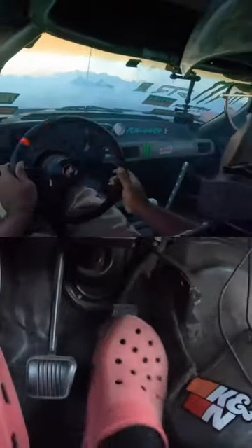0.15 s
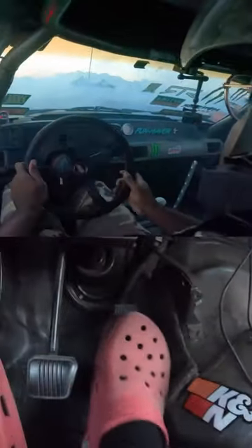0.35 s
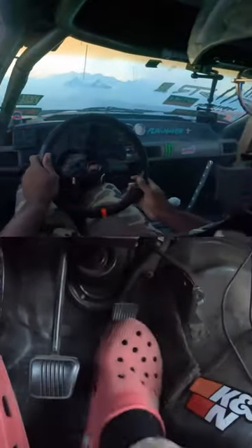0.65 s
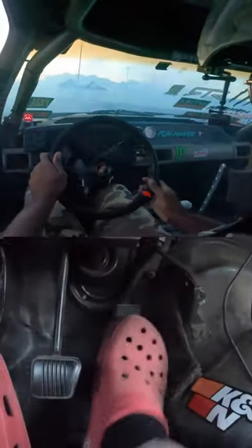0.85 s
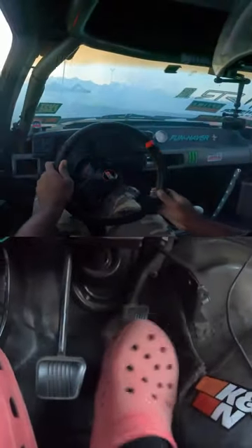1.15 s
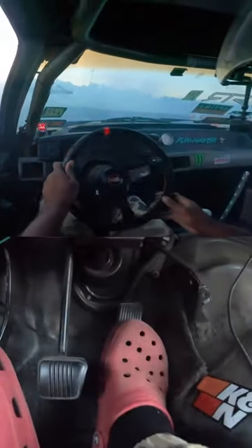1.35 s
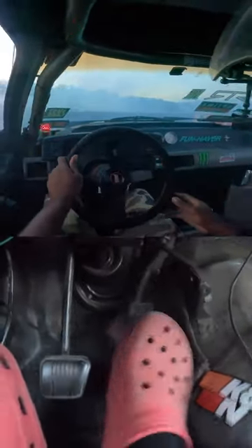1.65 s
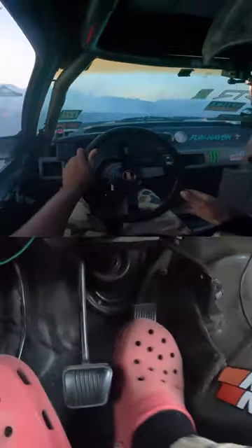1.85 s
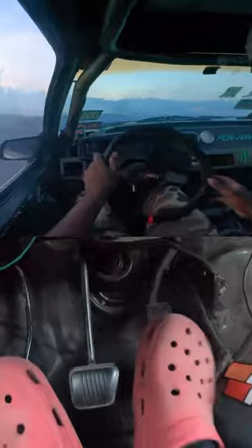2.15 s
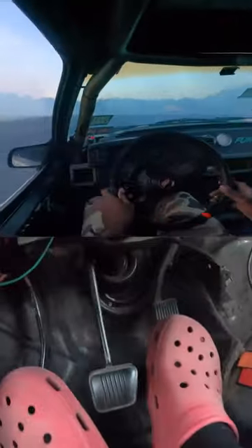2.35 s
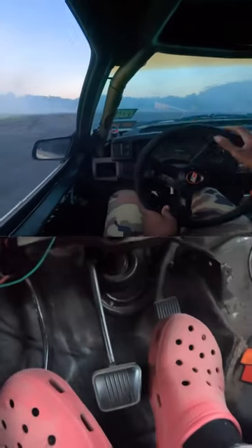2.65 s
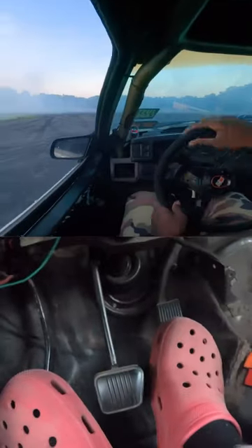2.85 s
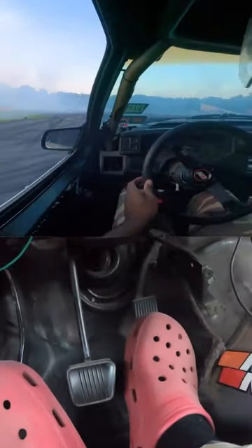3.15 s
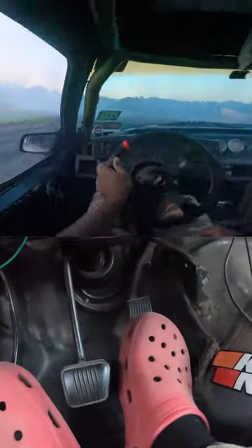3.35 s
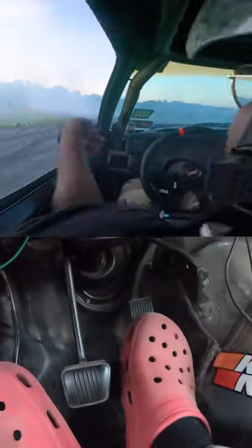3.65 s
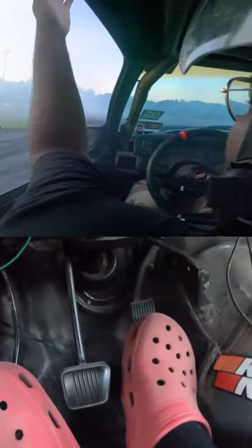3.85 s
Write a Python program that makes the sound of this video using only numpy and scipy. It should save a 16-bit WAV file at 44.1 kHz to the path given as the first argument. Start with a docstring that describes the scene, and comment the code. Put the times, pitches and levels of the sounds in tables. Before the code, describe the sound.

Inside a stripped car, from the driver's seat: a loud raspy eight-cylinder engine lifts and surges, revs fall under wavering tyre squeal, a gritty scuff follows, then a low uneven drone with slight rattles and wind.

```python
"""Inside a drifting car: an eight-cylinder engine roars at high revs, built from harmonics, pulses and noise.
The throttle is lifted and stabbed, with burble and ragged pops, while shaped noise makes wind and road.
Then the revs sink and the tyres howl through a slide: two unsteady tones that end in a gritty scuff.
The engine picks up again in a low drone, late on with a limping beat and bark as one cylinder misses.
Loose parts clatter in the bare cabin from the end of the slide on, as short bursts of grainy noise."""
import sys
import numpy as np
from scipy import signal
from scipy.fft import rfft, irfft, next_fast_len
from scipy.io import wavfile
from scipy.ndimage import uniform_filter1d, minimum_filter1d, map_coordinates

SR = 44100
rng = np.random.default_rng(int(sys.argv[2]) if len(sys.argv) > 2 else 0)


def store_wav(level_fs):
    """Save 16-bit WAV to argv[1]."""
    pcm = np.round(np.clip(np.atleast_2d(level_fs), -1, 1) * 32767)
    wavfile.write(sys.argv[1], SR, pcm.T.astype(np.int16))


N = 175959  # length in samples
CYLINDERS = 8


def amp(db):
    """Turn decibels into a plain multiplier."""
    return 10 ** (np.asarray(db) / 20)


def unit(x):
    """Bring a sound to an average (rms) level of 1."""
    return x / np.sqrt(np.mean(x ** 2) + 1e-20)


def curves(rows):
    """Join a table's points with straight lines: one value per sample for each column after the time."""
    times_s, *columns = np.transpose(rows)
    return [np.interp(np.arange(N) / SR, times_s, column) for column in columns]


def wobble(rate):
    """A random curve around 0, drawn through `rate` random points a second."""
    coarse = np.arange(0, N + 32, 32)  # worked out every 32 samples, then joined up
    knots = rng.standard_normal(4096)
    coarse_curve = map_coordinates(knots, [coarse * rate / SR], mode="wrap")
    return np.interp(np.arange(N), coarse, coarse_curve)


def filtered(x, response):
    """Multiply each frequency of x by response(frequency in Hz)."""
    size = next_fast_len(N + SR // 2)  # spare room so that the end does not wrap onto the start
    spectrum = rfft(x, size) * response(np.fft.rfftfreq(size, 1 / SR))
    return irfft(spectrum, size)[:N]


def shaped(x, points):
    """Raise or lower the frequencies of x along a curve of (frequency_hz, level_db) points."""
    point_hz, point_db = np.transpose(points)
    return filtered(x, lambda hz: amp(np.interp(np.log(hz + 1), np.log(point_hz), point_db)))


def coloured(x, points):
    """Shape x in the same way, then bring it to rms 1."""
    return unit(shaped(x, points))


def noise(points):
    """Random noise of a given colour, at rms 1."""
    return coloured(rng.standard_normal(N), points)


def engine():
    """One crankshaft drives every engine sound, so they all speed up and slow down together."""
    # exhaust note on open throttle: time_s, level_db (before the cabin)
    roar_level = [(0, -10.5), (0.168, -9), (0.269, -13), (.45, -11.5), (.6, -9.5), (0.921, -9.5),
                  (1.06, -12.5), (1.129, -15.5), (1.23, -15), (1.33, -7), (1.6, -10.5), (1.68, -17.5),
                  (1.8, -14.5), (1.859, -10.5), (1.951, -8), (2.1, -24), (2.3, -55)]
    # exhaust burble on closed throttle: time_s, level_db (before the cabin)
    burble_level = [(0.981, -33.5), (1.119, -13.5), (1.55, -40), (1.669, -12.5), (1.87, -23), (2.88, -16),
                    (3.02, -41)]
    # exhaust drone pulling from low revs: time_s, level_db (before the cabin)
    drone_level = [(2.749, -51.5), (2.9, -15), (2.98, -10.5), (3.25, -11), (3.401, -14), (3.7, -8.5),
                   (3.99, -9.5)]
    # harmonics of each exhaust sound: multiple of the engine cycle, relative level_db
    roar_orders = [(1, -14), (2, 2), (3, -17), (4, -1.5), (5, -8), (6, -13), (7, -14), (8, 0), (9, -13),
                   (11, -17), (12, -13), (16, -16), (17, -13), (20, -17)]
    burble_orders = [(1, -11), (3, 7.5), (4, -7), (5, -2), (6, -4), (7, -1.5), (8, -3.5)]
    drone_orders = [(4, -21.5), (5, -18), (6, -20.5), (8, 1.5), (9, -17), (10, -16.5), (11, -17),
                    (14, -16.5), (16, -10), (17, -20), (19, -18.5), (20, -21), (24, -16.5), (40, -24)]
    # unevenness of burning at high revs: time_s, roughness (0-1)
    misfire = [(.15, 0.2), (.26, 0.66), (.55, .08), (.95, .08), (1.2, 0.8), (1.42, 0.1), (1.6, 0.3),
               (1.72, 0.6), (2.1, 0.82)]
    # how the bare cabin favours or swallows the exhaust harmonics: frequency_hz, level_db
    cabin = [(55, -2.5), (84, -3), (104, -11), (125, -3), (147, 3), (172, -7), (205, 5), (232, 2.5),
             (266, 6), (300, -1), (328, -2), (350, 1), (410, 3.5), (485, -4), (530, -2.5), (800, -8),
             (900, -0.5), (970, -4)]
    # a hoarse resonance of the exhaust under load: time_s, level_db
    hoarse_level = [(3.1, -49.5), (3.45, -33.5), (3.8, -32), (3.99, -32)]
    # shape of that resonance: frequency_hz, relative level_db
    hoarse_colour = [(600, -37), (790, -1), (845, 4.5), (910, -17), (1500, -69)]

    cycles = crank(flutter=.002)
    misfire_rough, = curves(misfire)
    roar = exhaust(cycles, roar_level, roar_orders, rough=misfire_rough, steadiness=2.1, rough_rate=45)
    burble = exhaust(cycles, burble_level, burble_orders, rough=0.76, steadiness=0.99, rough_rate=55)
    drone = exhaust(cycles, drone_level, drone_orders, rough=0.48, steadiness=7, rough_rate=28)
    grit = rasp(cycles, pulse_db=6, gas_db=0.5, gating=0.38, drift_rate=7, count=14)
    hoarse_pulses = firings(cycles, stagger=.1, jitter=0.037, cylinder_db=4.5, scatter_db=-0.5)
    hoarse = amp(curves(hoarse_level)[0]) * coloured(hoarse_pulses, hoarse_colour)
    high_revs = shaped(roar + burble, cabin)
    low_revs = loping(shaped(drone, cabin), cycles, rough=0.56)
    return high_revs + low_revs + pops(cycles) + grit + hoarse


def crank(flutter):
    """Count engine cycles by adding up the speed; eight firings make one cycle, and the speed is a bit uneven."""
    # engine speed before the flutter: time_s, firing_hz (firings per second)
    speed = [(0, 398.4), (.08, 411.2), (.18, 401.4), (.22, 379.1), (.5, 402.1), (.63, 405.3), (.74, 424),
             (.83, 413.3), (.9, 413.2), (1.02, 435.7), (1.09, 419.1), (1.2, 359.6), (1.27, 347.5),
             (1.36, 349.8), (1.47, 388.3), (1.56, 403.2), (1.63, 403.8), (1.69, 368.4), (1.78, 341),
             (1.84, 307.3), (1.96, 310.8), (2.1, 255), (2.33, 155.9), (2.8, 98.24), (2.94, 127.2),
             (3.02, 133.9), (3.22, 133.9), (3.3, 144.8), (3.5, 147.5), (3.76, 162.4), (3.9, 163),
             (3.99, 169.3)]
    firing_hz, = curves(speed)
    unsteady_hz = firing_hz * (1 + flutter * wobble(35))
    return np.cumsum(unsteady_hz) / SR / CYLINDERS


def exhaust(cycles, level, orders, rough, steadiness, rough_rate):
    """Add harmonics of the engine cycle, each shaken at random by uneven burning."""
    out = np.zeros(N)
    for order, db in orders:
        order = round(order)
        firing = order in (CYLINDERS // 2, CYLINDERS, 2 * CYLINDERS)
        # with steadiness well above 1, firing harmonics shake only when the burning is very uneven
        shake = np.clip(rough, 0, 1) ** (steadiness if firing else 1)
        start = 0 if firing else rng.random()
        phase = 2 * np.pi * (order * cycles + start)
        in_step = (1 + shake * wobble(rough_rate)) * np.cos(phase)
        out_of_step = shake * wobble(rough_rate) * np.sin(phase)
        out += amp(db) * (in_step + out_of_step)
    return unit(out) * amp(curves(level)[0])


def firings(cycles, stagger, jitter, cylinder_db, scatter_db):
    """One pulse per firing; its time (in firing gaps) and size vary by cylinder and by chance."""
    count = np.arange(2048)
    own = rng.standard_normal((2, CYLINDERS))[:, count % CYLINDERS]  # each cylinder's own timing and size
    moment = count + stagger * own[0] + jitter * rng.standard_normal(len(count))
    at = np.interp(moment, cycles * CYLINDERS, np.arange(N))
    sizes = amp(cylinder_db * own[1] + scatter_db * rng.standard_normal(len(count)))
    sizes = sizes * (at > 0) * (at < N - 1)  # drop firings outside the scene
    # make crowded pulses smaller, so that fast running is not louder
    return np.bincount(at.astype(int), sizes, N) / np.sqrt(np.gradient(cycles))


def rasp(cycles, pulse_db, gas_db, gating, drift_rate, count):
    """Each firing sends a sharp pulse and gas noise pulses along; the pulse's brief cabin ring keeps shifting."""
    # exhaust rasp, before the pulse and gas levels: time_s, level_db
    rasp_level = [(0.0, -34), (0.07, -28.5), (0.2, -37.5), (0.21, -28), (0.38, -30.5), (0.47, -26.5),
                  (0.59, -34.5), (0.69, -26.5), (0.79, -35), (0.95, -30.5), (1.04, -26), (1.09, -31),
                  (1.22, -34), (1.24, -25.5), (1.32, -29.5), (1.58, -29.5), (1.81, -41), (1.83, -29),
                  (1.91, -30), (1.98, -35.5), (2.4, -50.5), (2.92, -46.5), (2.97, -45.5), (3.36, -40.5),
                  (3.99, -49)]
    # its colour: frequency_hz, relative level_db
    rasp_colour = [(250, -30.5), (450, 11.5), (620, 7), (740, 2), (900, 4), (1300, -0.5), (1800, -2.5),
                   (2520, -7.5), (2900, -15), (3800, -17.5), (5000, -28.5), (8000, -40.5), (12500, -54.5)]
    cabin_t60_s = .035  # time for the ring to fall by 60 dB

    pulses = firings(cycles, stagger=.3, jitter=.028, cylinder_db=1.5, scatter_db=1.5)
    t = np.arange(SR // 8) / SR
    tails = rng.standard_normal((count, len(t))) * amp(-60 * t / cabin_t60_s)
    # blend several rings, with the shares drifting while their summed power stays even
    shares = np.array([wobble(drift_rate) for _ in tails])
    shares = shares / np.linalg.norm(shares, axis=0)
    blend = sum(share * signal.fftconvolve(pulses, tail)[:N] for share, tail in zip(shares, tails))
    ringing = coloured(blend, rasp_colour)
    # the gas swells at half the firing rate and once per engine cycle
    swell = (np.cos(np.pi * CYLINDERS * cycles) + np.cos(2 * np.pi * cycles)) / 2
    gas = coloured((1 + gating * swell) * rng.standard_normal(N), rasp_colour)
    return amp(curves(rasp_level)[0]) * (amp(pulse_db) * ringing + amp(gas_db) * gas)


def pops(cycles):
    """Ragged firings thump the fixed resonances of the exhaust pipe."""
    # ragged exhaust pops: time_s, level_db
    pop_level = [(.15, -42.5), (.22, -25.5), (.42, -25.5), (.52, -46), (1.03, -39), (1.09, -14.5),
                 (1.2, -19), (1.3, -30.5), (1.6, -33.5), (1.66, -18), (1.78, -16.5), (1.9, -27),
                 (2.05, -16), (2.9, -21.5), (3.02, -49)]
    # exhaust pipe resonances: centre_hz, width_hz, relative level_db
    resonances = [(56, 21.2, -2), (145, 24.96, 1), (256, 72.3, -8.5), (378.5, 87.8, -15)]

    pulses = firings(cycles, stagger=.2, jitter=.45, cylinder_db=1, scatter_db=1.5)

    def pipe(hz):
        """Add the resonances, every other one upside down."""
        total = 0
        for k, (centre, width, db) in enumerate(resonances):
            damping = 1j * hz * width
            total = total + (-1) ** k * amp(db) * damping / (centre * centre - hz * hz + damping)
        return total

    return amp(curves(pop_level)[0]) * unit(filtered(pulses, pipe))


def loping(drone, cycles, rough):
    """One cylinder misses: once per engine cycle the drone dips and the exhaust gives a short bark."""
    # how deeply the drone dips: time_s, depth (0-1)
    lope_depth = [(3.45, 0.01), (3.68, 0.2), (3.77, .85), (3.99, 0.6)]
    # colour of the bark's noise: frequency_hz, relative level_db
    bark_colour = [(150, -30.5), (280, 6), (520, -3), (1500, -61.5)]
    miss_s, bark_lag_s = 3.757, .003  # the moment of one miss, which sets its place in every cycle
    sharpness, bark_order, bark_db = 2.5, 18, -14  # bark_order: multiple of the engine cycle

    depth = np.clip(curves(lope_depth)[0], 0, 1)

    def turn(moment_s):
        """Angle of the engine cycle, counted from a given moment."""
        return 2 * np.pi * (cycles - np.interp(moment_s * SR, np.arange(N), cycles))

    def gate(moment_s):
        """A smooth bump once per cycle."""
        return depth * np.exp(sharpness * (np.cos(turn(moment_s)) - 1))

    bark = np.sin(bark_order * turn(miss_s)) + rough * noise(bark_colour)
    return drone * (1 - gate(miss_s)) + amp(bark_db) * gate(miss_s + bark_lag_s) * unit(bark)


def tyres(waver_rate, chatter_db, scrub, scrub_rate):
    """The sliding tread howls with its octave, chattering as it grips and slips, in a narrow band of scrub."""
    # sliding tyres: time_s, pitch_hz (before the waver), fundamental level_db, octave level_db
    squeal = [(1.68, 1024, -54.5, -68), (1.75, 1000, -24.5, -48), (1.8, 931.3, -32, -60),
              (1.85, 900, -29, -62), (1.95, 926.1, -38.5, -67), (2.1, 877.2, -26, -56),
              (2.18, 730, -26.5, -38), (2.28, 676.6, -21, -32.5), (2.48, 637.7, -19.5, -25),
              (2.58, 641.7, -21, -28), (2.77, 620, -24, -26.5), (2.9, 635.3, -35, -33),
              (2.98, 634, -55, -50)]
    # unsteadiness of the squeal: time_s, size of the waver (share of the pitch)
    waver_share = [(1.75, 0.03003), (2.07, 0.058), (2.26, .022)]

    pitch_hz, low_db, high_db = curves(squeal)
    waver, = curves(waver_share)
    phase = 2 * np.pi * np.cumsum(pitch_hz * (1 + waver * wobble(waver_rate))) / SR
    out = np.zeros(N)
    for k, db in ((1, low_db), (2, high_db)):
        howl = amp(chatter_db * wobble(80)) * np.sin(k * phase)
        rub = wobble(scrub_rate) * np.sin(k * phase) + wobble(scrub_rate) * np.cos(k * phase)
        out += amp(db) * unit(howl + scrub * rub)
    return out


def scuff():
    """The tyres bite again: a short gritty swell of noise as the slide ends."""
    # colour of the scuff: frequency_hz, relative level_db
    scuff_colour = [(800, -5.5), (1900, -0.5), (3300, -7), (4500, -13), (12500, -47.5)]
    peak_s, peak_db, width_s = 2.985, -34.5, 0.028
    swell = np.exp(-((np.arange(N) / SR - peak_s) / width_s) ** 2 / 2)
    return amp(peak_db) * swell * noise(scuff_colour)


def clatter(grain_db):
    """Loose parts shake in short grainy bursts of noise, each swelling to a peak and dying away."""
    # cabin clatter: peak_s, level_db, rise_s (before the peak), t60_s (time to fall by 60 dB)
    bursts = [(2.775, -47.5, 0.021, 0.19), (2.945, -49.5, .02, .2), (3.19, -37, .002, .05),
              (3.91, -47, .003, 0.0492)]
    # its colour: frequency_hz, relative level_db
    clatter_colour = [(600, -8.5), (2000, -4), (3500, 5), (4600, -4.5), (5800, 0.5), (8000, -9.5),
                      (12500, -28.5)]

    t = np.arange(N) / SR
    envelope = np.zeros(N)
    for peak_s, db, rise_s, t60_s in bursts:
        fall = amp(db - 60 * np.maximum(t - peak_s, 0) / t60_s)
        rise = np.clip(1 + (t - peak_s) / rise_s, 0, 1)
        envelope += fall * rise
    return envelope * unit(amp(grain_db * wobble(370)) * noise(clatter_colour))


def air(wind_db, lumps_db, road_db, hiss_db):
    """Lumpy wind at the open window, nearly steady road noise and a thin hiss, all of shaped noise."""
    # wind at the window, before wind_db is added: time_s, level_db
    wind_level = [(.03, -23), (.16, -37), (.22, -22.5), (.42, -20.5), (.57, -46.5), (.79, -15),
                  (.87, -37.5), (1, -27.5), (1.11, -24.5), (1.27, -16.5), (1.5, -29.5), (1.63, -19),
                  (1.73, -38), (1.8, -18.5), (2.8, -19.5), (3.01, -25), (3.67, -30.5), (3.96, -17.5)]
    # colour of the wind: frequency_hz, relative level_db
    wind_colour = [(12, -37.5), (26, -17.5), (50, -4.5), (100, -11.5), (200, -14), (500, -43), (1500, -92)]
    # colour of the road noise: frequency_hz, relative level_db
    road_colour = [(30, -29), (140, -2), (300, -5), (480, -2.5), (820, -9), (1100, -15), (2000, -23.5),
                   (4000, -39), (10000, -75)]
    # treble hiss, before hiss_db and a slight flicker are added: time_s, level_db
    hiss_level = [(.03, -58.5), (.54, -64), (1.48, -61), (1.87, -60.5), (2.67, -78.5), (2.79, -63.5),
                  (3.17, -62.5), (3.5, -56.5), (3.96, -62)]
    # colour of the hiss: frequency_hz, relative level_db
    hiss_colour = [(1500, -31.5), (4000, 1), (7000, -4.5), (9000, -14.5), (11300, -21.5), (12500, -14.5)]

    lumpy = unit(amp(lumps_db * wobble(20)) * noise(wind_colour))
    wind = amp(curves(wind_level)[0] + wind_db) * lumpy
    road = amp(road_db + .6 * wobble(8)) * noise(road_colour)
    hiss = amp(curves(hiss_level)[0] + hiss_db + wobble(90)) * noise(hiss_colour)
    return wind + road + hiss


def scene():
    """Everything as heard from the driver's seat, in one channel."""
    skid = tyres(waver_rate=170, chatter_db=1.0, scrub=0.73, scrub_rate=150) + scuff()
    rattle = clatter(grain_db=2.5)
    background = air(wind_db=-0.5, lumps_db=2, road_db=-26.5, hiss_db=3.0)
    return (engine() + skid + rattle + background)[None]


def record(dry):
    """A fast limiter turns down the peaks, then everything above the band limit is removed."""
    ceiling, top_hz = .82, 13100  # ceiling: share of full scale, before the band limit
    need = np.minimum(1, ceiling / (np.abs(dry[0]) + 1e-9))
    # hold the lowest gain around each peak, then smooth it (300 samples, about 7 ms)
    gain = uniform_filter1d(minimum_filter1d(need, size=300), size=300)
    return filtered(dry[0] * gain, lambda hz: hz < top_hz)[None]


dry = scene()
out = record(dry)
store_wav(out)
```